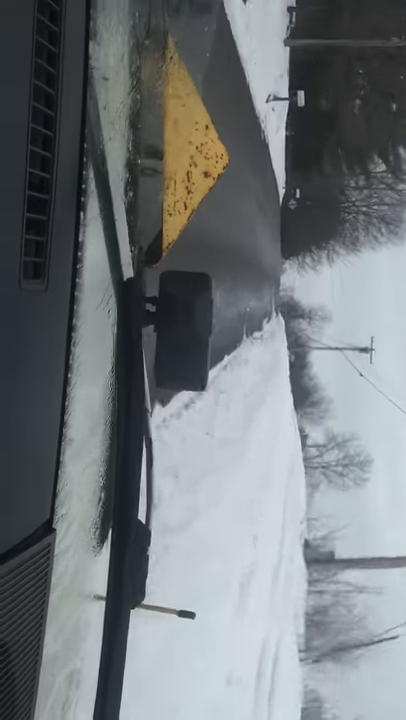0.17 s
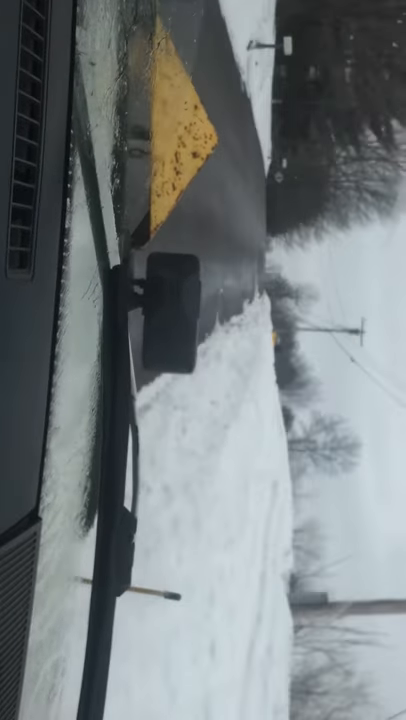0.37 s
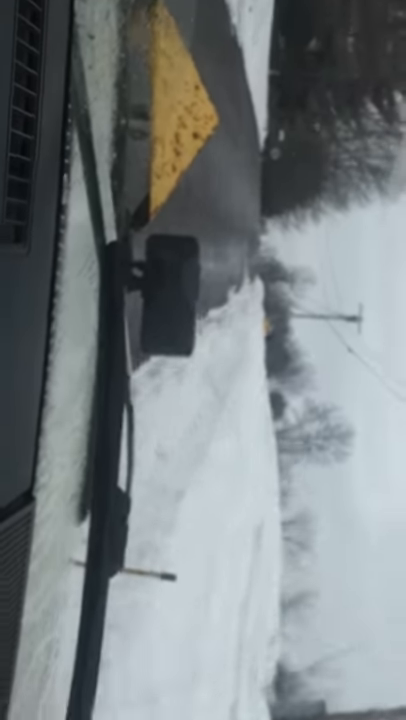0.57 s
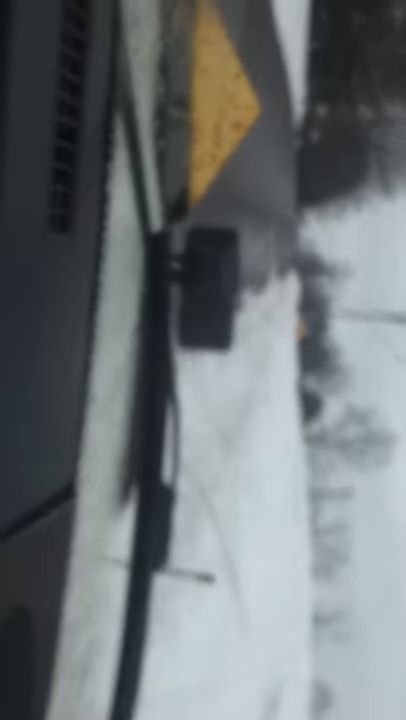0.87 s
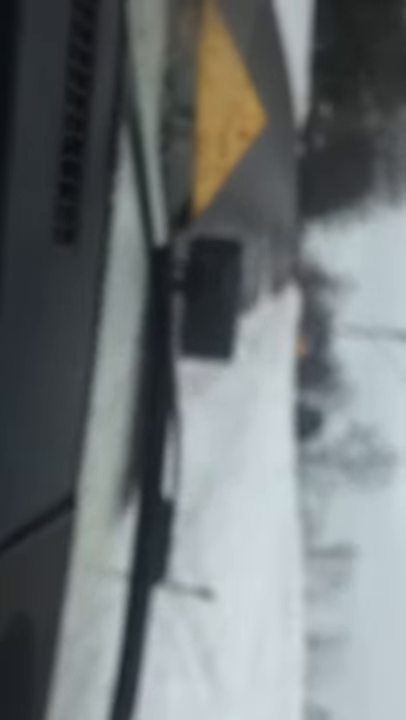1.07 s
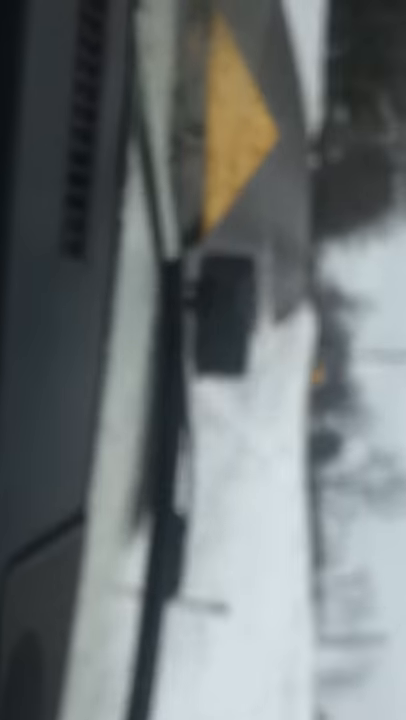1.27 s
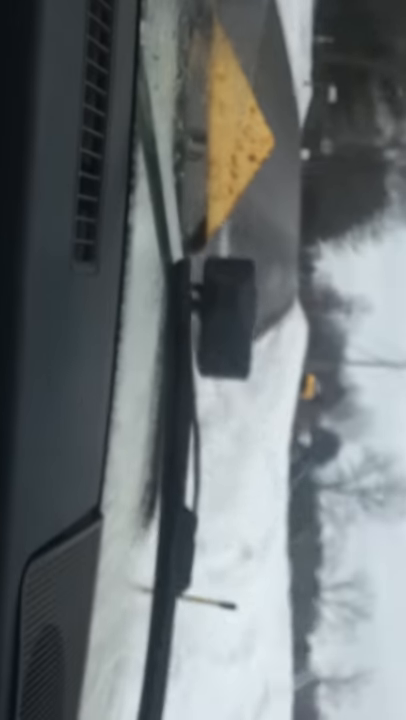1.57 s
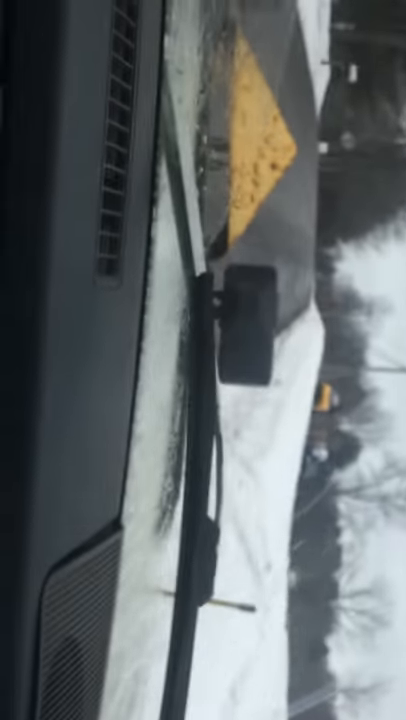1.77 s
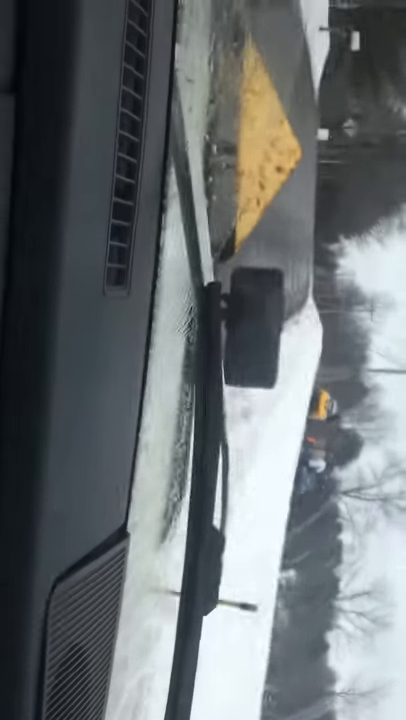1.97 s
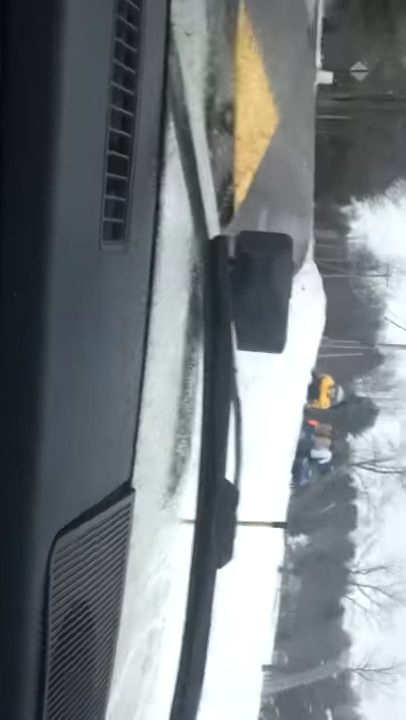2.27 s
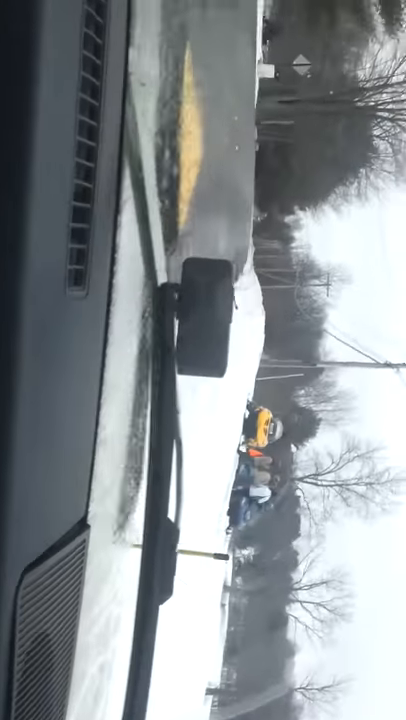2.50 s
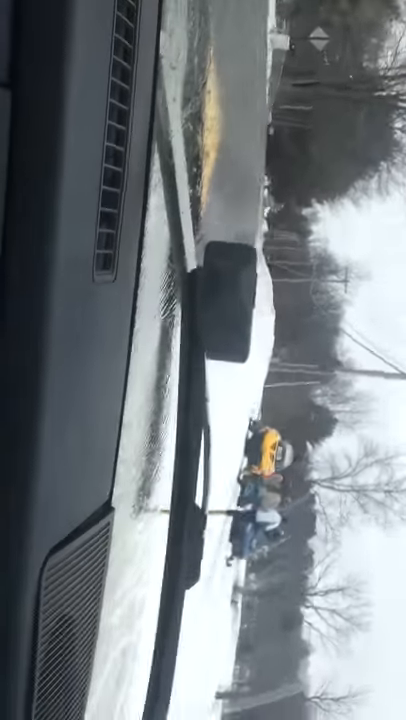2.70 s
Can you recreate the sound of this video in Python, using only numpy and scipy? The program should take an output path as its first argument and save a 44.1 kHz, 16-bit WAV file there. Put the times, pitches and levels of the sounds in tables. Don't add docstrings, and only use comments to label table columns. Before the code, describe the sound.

A plough truck heard from inside the cab: low diesel drone, road roar and steady blade hiss with small gritty catches and knocks, then harsh metal scraping, squeals and heavy thumps overloading a small phone microphone.

```python
import sys
import numpy as np
from scipy import signal
from scipy.fft import rfft, irfft
from scipy.io import wavfile
from scipy.ndimage import uniform_filter1d

SR = 44100
rng = np.random.default_rng(int(sys.argv[2]) if len(sys.argv) > 2 else 0)


def pcm_store(signal):
    levels = np.round(np.clip(np.atleast_2d(signal), -1, 1) * 32767)
    wavfile.write(sys.argv[1], SR, levels.astype(np.int16).T)


def invert_db(level):
    return 10 ** (np.asarray(level, dtype=float) / 20)


N = 125244


def rms_one(x):
    return x / np.sqrt(np.mean(x ** 2) + 1e-20)


def in_time(rows):
    s, *columns = np.transpose(rows)
    return [np.interp(np.arange(N) / SR, s, c) for c in columns]


def drift(rate):
    r = np.exp(-80 * np.pi * rate / SR)
    slow = signal.lfilter([1], [1, -2 * r, r * r], rng.standard_normal(N // 40 + 2002))[2000:]
    slow = rms_one(slow - slow.mean())
    return np.interp(np.arange(N) / 40, np.arange(len(slow)), slow)


def ring(x, hz, t60):
    r = invert_db(-60 / (t60 * SR))
    w = 2 * np.pi * hz / SR
    return signal.lfilter([0, np.sin(w)], [1, -2 * r * np.cos(w), r * r], x + 1e-18)


def hum(modes):
    out = 0
    for hz, width, db in modes:
        noise = rng.standard_normal(N + SR)
        out = out + invert_db(db) * rms_one(ring(noise, hz, 2.7 / width)[SR:])
    return out


def burst(s, length, attack):
    u = np.maximum(np.arange(N) / SR - s, 0) / length
    return 1.33 * (1 - np.exp(-u / attack)) * np.exp(-u ** 2)


def coloured(x, spectrum, patchy_db):
    hz = np.fft.rfftfreq(N, 1 / SR) + 1
    table_hz, table_db = np.transpose(spectrum)
    shaped = rfft(x) * invert_db(np.interp(np.log(hz), np.log(table_hz), table_db, left=-90, right=-90))
    out, together = 0, drift(7.4)
    for octave in range(4, 15):
        share = np.cos(np.pi / 2 * np.clip(np.log2(hz) - octave, -1, 1)) ** 2
        flicker_db = patchy_db * (1.13 * together + drift(24))
        out = out + irfft(shaped * share, N) * invert_db(flicker_db)
    return rms_one(out)


# (time [s], level [dB])
GROUND = [
    (0.0, -20),
    (0.8, -20),
    (0.86, -23),
    (0.97, -20.5),
    (1.98, -21),
    (2.33, -11),
    (2.56, -17),
    (2.58, -11),
    (2.84, -18),
]
# (frequency [Hz], level [dB per Hz])
ROAR = [(8.8, -32), (15, -2), (43, -1), (64, -5.5), (213, -13.5), (356, -14), (461, -21), (1810, -30),
        (2500, -35), (3250, -39.5), (5500, -120)]
# (frequency [Hz], width [Hz], level [dB])
CAB = [(22.24, 7.6, 2), (29.8, 9.7, -1), (36.4, 5.8, -0.5), (44.2, 18, 0.5), (80.2, 14, -5.5),
       (90.3, 24.5, -3)]


def road(turn):
    boom_db, boom_follows = -17, 0.28
    roar_trim_db, clatter_depth = -0.5, 0.056
    ground_db, = in_time(GROUND)
    boom = invert_db(boom_db + boom_follows * (ground_db - ground_db.min())) * rms_one(hum(CAB))
    roar = coloured(rng.standard_normal(N), [(hz, db) for hz, db in ROAR if hz > 40], patchy_db=-0.5)
    roar = signal.sosfilt(signal.butter(2, 70, "high", fs=SR, output="sos"), roar)
    throb = 1 + clatter_depth * np.sin(turn)
    return boom + invert_db(ground_db + roar_trim_db) * rms_one(roar) * throb


# (time [s], rate [Hz])
FIRING = [(0, 58.28), (1.4, 56.46), (2.84, 56.22)]
# (multiple of firing rate, level [dB])
ENGINE_ORDERS = [(1, -19.5), (.667, -26), (1.333, -31), (1.667, -35.5), (2, -36.5)]
# (time [s], pitch [Hz])
WHINE = [(0, 362.4), (1.4, 353.8), (2.1, 347.4), (2.84, 342)]


def engine():
    firing_waver_db = 0.5
    whine_db, whine_half_db, whine_waver_db = -30, -38, 1.7
    turn = 2 * np.pi * np.cumsum(in_time(FIRING)[0] * (1 + 0.007 * drift(2.54))) / SR
    out = 0
    for order, db in ENGINE_ORDERS:
        level = invert_db(db + firing_waver_db * drift(5.9))
        out = out + level * np.sin(order * turn + rng.uniform(0, 6.48))
    gear = 2 * np.pi * np.cumsum(in_time(WHINE)[0] * (1 + 0.0015 * drift(6))) / SR
    out = out + invert_db(whine_db + whine_waver_db * drift(6.2)) * np.sin(gear)
    out = out + invert_db(whine_half_db + whine_waver_db * drift(3.3)) * np.sin(gear / 2)
    return np.sqrt(2) * out, turn


# (frequency [Hz], width [Hz], level [dB])
SHUDDER = [(108.4, 16, -34), (149.2, 29, -35.5), (171.6, 14.7, -35.5)]


def shudder():
    ground_db, = in_time(GROUND)
    follows = 1.36
    return invert_db(follows * (ground_db - ground_db.min())) * hum(SHUDDER)


# (time [s], peak [dB], tilt [dB per octave])
KNOCKS = [(0.074, -27, 3), (1.184, -22, -1), (1.576, -18, 0), (1.989, -33, -5), (2.415, -18, 4),
          (2.424, -18, 5), (2.58, -15, -11), (2.59, -12.5, -10), (2.648, -18, -16), (2.678, -15, -7),
          (2.766, -21.5, 5.5)]
# (frequency [Hz], level [dB], t60 [s])
MOUNT = [(350, -9.5, 0.024), (653, -1.5, 0.14), (970, -7, 0.013), (1085, 6, 0.025), (1280, -1, 0.031),
         (1560, 5, 0.023), (1780, 1.5, 0.065), (2110, -15, 0.037)]


def knocks():
    s, db, tilt_db = np.transpose(KNOCKS)
    chance_db = rng.normal(0, 4.2, (len(s), len(MOUNT)))
    out = 0
    for k, (hz, level_db, t60) in enumerate(MOUNT):
        clicks = np.zeros(N)
        strength_db = db + level_db - 4 + tilt_db * np.log2(hz / 1000) + chance_db[:, k]
        clicks[(s * SR).astype(int)] = invert_db(strength_db)
        out = out + ring(clicks, hz, t60)
    return out


# (time of the main upward swing [s], peak [dB], pitch [Hz], t60 [s])
THUMPS = [(2.075, -4, 50, .06), (2.095, 1, 50, .07), (2.175, -7, 25, .06), (2.145, -11, 110, .15),
          (2.152, -10, 40, .12), (2.268, -10, 140, .1), (2.305, 4, 40, .19), (2.331, -7, 115, .2),
          (2.446, -2, 33, .15), (2.485, -8, 40, .15), (2.6, -9, 36, .12), (2.63, -4, 33, .22),
          (2.68, -6, 30, .15), (2.812, -4, 32, .12)]


def thumps():
    rise_s = 0.014
    out = 0
    for s, db, hz, t60 in THUMPS:
        u = np.arange(N) / SR - s
        swell = np.exp(-(np.minimum(u, 0) / rise_s) ** 2)
        decay = invert_db(-60 * np.maximum(u, 0) / t60)
        out = out + invert_db(db) * decay * swell * np.cos(2 * np.pi * hz * u)
    return out


def grit():
    stones_per_s, spread_db = 2500, 1
    sizes = invert_db(spread_db * np.minimum(rng.exponential(1, N), 5)) * rng.choice([-1, 1], N)
    stones = rms_one(sizes * (rng.random(N) < stones_per_s / SR))
    return stones + rng.standard_normal(N)


SCRAPE_ATTACK_SHARE = 0.51

# (time [s], length [s], frequency [Hz], width [Hz], level [dB])
SQUEAL = [
    (4.3, 0.062, 3250, 40, -27),
    (2.715, 0.12, 1600, 56, -26.5),
    (2.4, .022, 5800, 700, -29.5),
    (2.215, .035, 4700, 900, -26),
    (2.258, 0.016, 3800, 500, -26),
    (2.258, .008, 5200, 600, -29),
    (2.332, .025, 4400, 600, -24),
    (1.3, 0.018, 4000, 800, -25),
]


def squeals():
    out = 0
    for s, length, *mode in SQUEAL:
        out = out + burst(s, length, SCRAPE_ATTACK_SHARE) * hum([mode])
    return out


# (frequency [Hz], level [dB per Hz])
HISS = [(290, 1), (500, -2), (931, -3), (1050, -3), (2140, -10), (2610, -18.5), (4790, -13), (11300, -40),
        (11800, -100), (15300, -122), (22000, -120)]
# (time [s], scrape [dB], deep share [dB], airy top [dB])
BUCK = [
    (2.09, -46, -7, 10),
    (2.105, -26, 3, 5.5),
    (2.3, -25.5, -0.5, 3.5),
    (2.46, -26, 7, 4),
    (2.55, -32, -5, 5.5),
    (2.84, -28.5, 12, -6.5),
]
# (time [s], level [dB], airy top [dB], length [s])
CATCHES = [(0.13, -31, -12, 0.022), (0.16, -31.5, -9, 0.081), (0.242, -38.5, -1, 0.036),
           (0.295, -33, 4, 0.017), (0.384, -34.5, 9.5, 0.047), (0.476, -48, 0, 0.0083),
           (0.557, -34.5, 11.5, 0.017), (0.648, -27, 7.5, 0.0083), (0.686, -30, 1, 0.011),
           (0.717, -34, -2, 0.072), (0.8, -36, 0, .01), (0.977, -34, -16, 0.042), (1.077, -33, 5.5, 0.04),
           (1.258, -28, -3.5, 0.021), (1.322, -35.5, -1, 0.023), (1.425, -35, -3, 0.02),
           (1.627, -37, 3, 0.03), (1.659, -33.5, 5, 0.054), (1.749, -32.5, -6, 0.013),
           (1.893, -36.5, -3, 0.037), (2.009, -37, 8, 0.065)]
# (time [s], bright [dB], airy top [dB], deep [dB], length [s])
SCRAPES = [(2.084, -40, -7, -31, 0.021), (2.159, -25, 13.5, -29, 0.029), (2.197, -25, -4, -12.5, 0.037),
           (2.229, -19, 8, -37, 0.057), (2.326, -17, 4.5, -35, 0.034), (2.362, -25.5, 15, -21, 0.022),
           (2.409, -20.5, 0, -13, 0.03), (2.487, -34.5, 2, -28, 0.028), (2.57, -30, -3, -19, 0.046),
           (2.625, -21.5, -1, -20, 0.011), (2.674, -26.5, 10, -12.5, 0.021), (2.762, -43, 2, -23.5, 0.038),
           (2.803, -31.5, -9, -21, 0.015)]
# (frequency [Hz], level [dB per Hz])
BRIGHT = [(1180, 0.5), (2000, -8), (2120, -3), (2860, -0.5), (3360, -1.5), (3870, 1.5), (5740, -4.5),
          (11800, -28.5), (15300, -55), (22000, -120)]
# (frequency [Hz], level [dB per Hz])
DEEP = [(60, -22), (110, -1), (170, -4), (280, -7), (360, -11), (650, -9), (1300, -14), (3000, -22),
        (4200, -50)]


def blade():
    hiss_db, air_hz, catch_attack_share = -27.5, 7000, 0.13
    scrape_db, deep_db, air_db = in_time(BUCK)
    bucking = (np.arange(N) / SR > BUCK[0][0]) * invert_db(scrape_db)
    bright, airy, deep = bucking, bucking * invert_db(air_db), bucking * invert_db(deep_db)
    for s, db, top_db, length in CATCHES:
        shape = invert_db(db) * burst(s, length, catch_attack_share)
        bright = bright + shape
        airy = airy + invert_db(top_db) * shape
    for s, db, top_db, low_db, length in SCRAPES:
        shape = burst(s, length, SCRAPE_ATTACK_SHARE)
        bright = bright + invert_db(db) * shape
        airy = airy + invert_db(db + top_db) * shape
        deep = deep + invert_db(low_db) * shape
    steel = coloured(grit(), BRIGHT, patchy_db=0.5)
    body = signal.sosfiltfilt(signal.butter(2, air_hz, fs=SR, output="sos"), steel)
    hiss = invert_db(hiss_db) * coloured(grit(), HISS, patchy_db=0.5)
    rumble = coloured(grit(), DEEP, patchy_db=1.5)
    return hiss + bright * body + airy * (steel - body) + deep * rumble


def scene():
    drone, turn = engine()
    return (road(turn) + drone + shudder() + knocks() + thumps() + squeals() + blade())[None]


TOP_HZ = 11900


def thin_treble(x):
    gate_hz, gate_db, gate_follows = 6000, -18.5, 0.68
    hz, _, z = signal.stft(x, SR, "cosine", nperseg=2048, noverlap=1024)
    power = uniform_filter1d(np.abs(z) ** 2, size=2, axis=0)
    mid_db = 10 * np.log10(power[(hz > 3500) & (hz < 6000)].mean(axis=0))
    usual_db = np.median(mid_db)
    least = invert_db(usual_db + gate_db + gate_follows * (mid_db - usual_db)) ** 2
    hz = hz[:, None]
    keep = ((hz < gate_hz) | (power > least)) & (hz < TOP_HZ) & (hz > 0)
    return signal.istft(z * keep, SR, "cosine", nperseg=2048, noverlap=1024)[1][:N]


def overload(x):
    ceiling, knee = 0.68, 16
    leak, fizz_cut = 0.03, 0.45
    x = leak * x + x / (1 + np.abs(x / ceiling) ** knee) ** (1 / knee)
    fizz = signal.sosfiltfilt(signal.butter(8, TOP_HZ, "high", fs=SR, output="sos"), x)
    return x - fizz_cut * fizz


def band_limit(x):
    return signal.sosfilt(signal.butter(12, 15900, fs=SR, output="sos"), x)


def record(dry):
    mix = overload(thin_treble(dry[0])[None])
    return band_limit(mix)


dry = scene()
out = record(dry)
pcm_store(out)
```